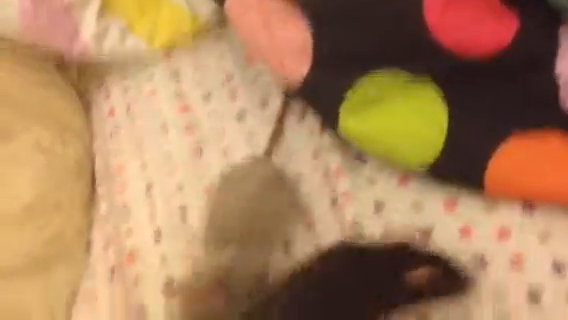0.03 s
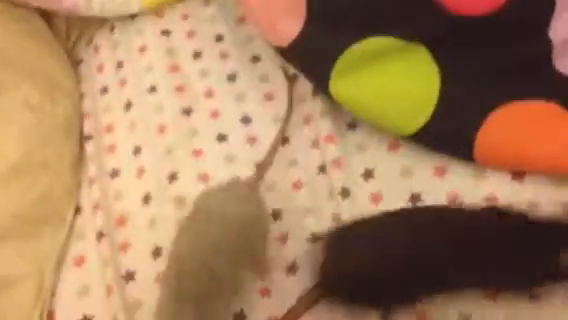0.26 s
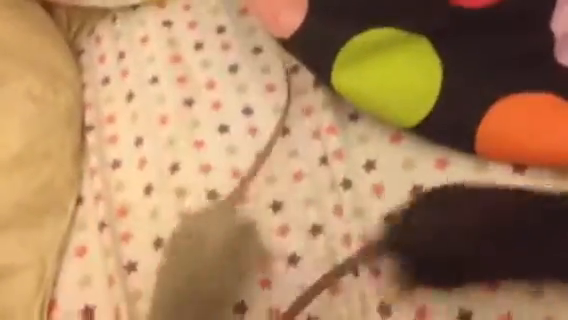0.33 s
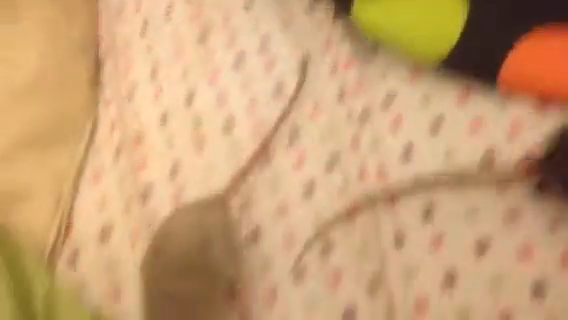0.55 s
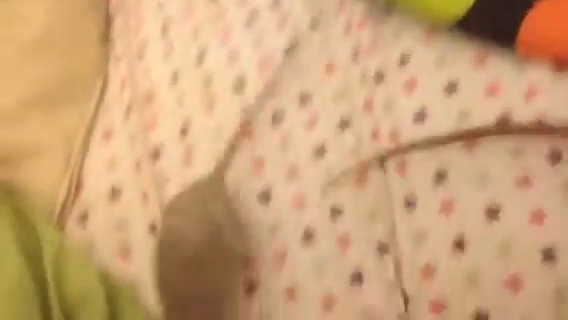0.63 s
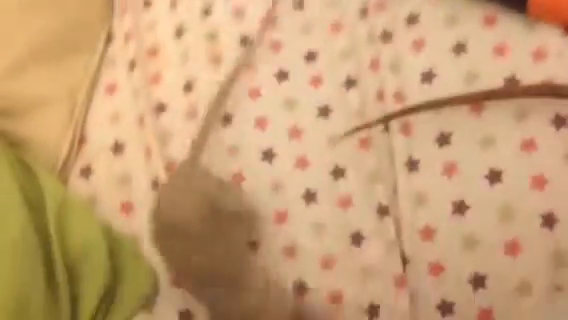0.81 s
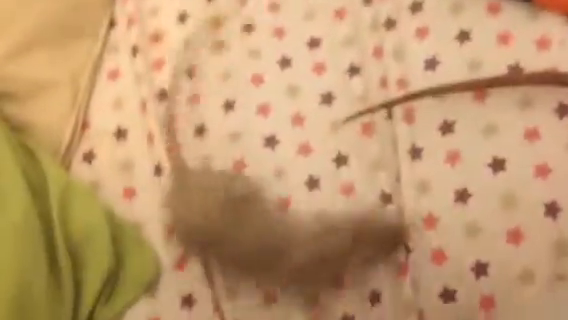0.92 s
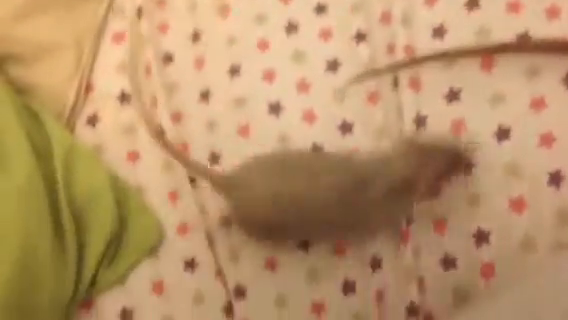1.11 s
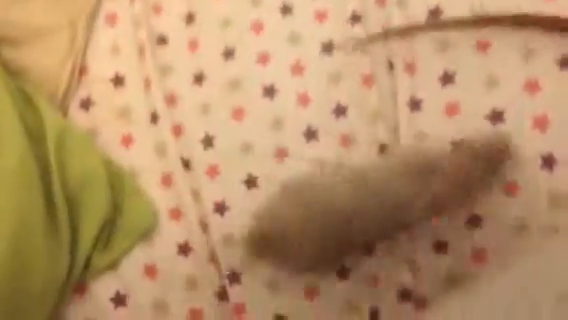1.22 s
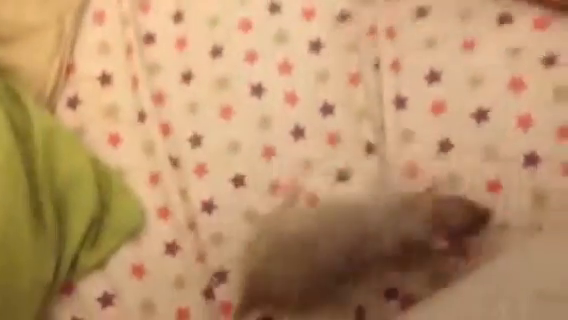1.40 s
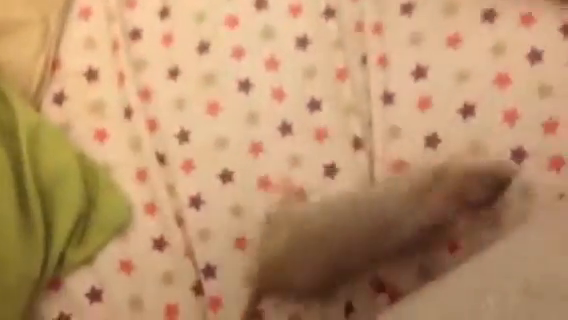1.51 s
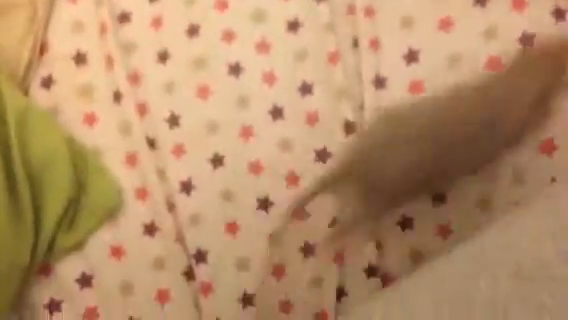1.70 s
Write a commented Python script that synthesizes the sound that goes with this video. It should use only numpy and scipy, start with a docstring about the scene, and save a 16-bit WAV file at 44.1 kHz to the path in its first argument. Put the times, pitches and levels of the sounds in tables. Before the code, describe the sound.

A hand-held camera's casing clicks, close and dry. One sharp snap at about 0.2 seconds is the loudest sound, followed by faint ticks. Clearer clicks come at 0.9, 1.1 and 1.3 seconds, then a quick cluster with a soft grip thud near 1.5. Faint fabric brushing and a few thin scratches from pet rats come in the second half, over light handling rustle and steady room hiss.

```python
"""A hand-held camera's casing gives one sharp snap and a string of dry clicks and ticks.
Each is a slip exciting the damped shell. Fingers bump it softly; a shifting grip thuds once.
Fabric brushes in short strokes, with faint scuffs and handling rustle.
The camera follows two pet rats, almost silent on their bedding but for a few thin scratches.
All close and dry, over the hiss of a quiet room."""
import sys
import numpy as np
from scipy import signal
from scipy.fft import rfft, irfft
from scipy.io import wavfile
from scipy.ndimage import map_coordinates

SR = 44100
rng = np.random.default_rng(int(sys.argv[2]) if len(sys.argv) > 2 else 0)


def transcribe(signal):
    """Save signal, clipped to [-1, 1], as a 16-bit WAV file at the path in sys.argv[1]."""
    frames = np.atleast_2d(signal).T
    limited = np.clip(frames, -1, 1)
    pcm = np.round(limited * 32767).astype(np.int16)
    wavfile.write(sys.argv[1], SR, pcm)


N = 77175
TIME_S = np.arange(N) / SR
FREQ_HZ = np.fft.rfftfreq(2 * N, 1 / SR)

# casing response to the snap: freq_hz, gain_db
SNAP_RESPONSE = [(40, -48), (100, -24.5), (240, -5), (400, -3.5), (560, -6.5), (1150, -4.5), (1450, -10.5),
                 (1780, -10.5), (2200, -1.5), (2850, -0.5), (4300, -14.5), (5100, -38), (6600, -23.5),
                 (8200, -37), (11000, -49), (14500, -36.5)]
# casing response to a click: freq_hz, gain_db
CLICK_RESPONSE = [(40, -45), (130, -31), (330, -8), (590, -10.5), (820, -4.5), (1100, -2.5), (1400, -6.5),
                  (1640, -15.5), (1830, -3.5), (2060, 1), (2450, -4), (3000, -4), (4300, -10.5),
                  (5100, -23.5), (6400, -19.5), (8100, -19), (10000, -29.5), (13500, -29), (15400, -37)]
# casing clicks: start_s, level_db, bass_db, treble_db
CASING_CLICKS = [(0.0692, -23.5, -1, -5), (0.2579, -29.5, 2, 6), (.264, -30, 2, 0), (0.5456, -20.5, 1, -12),
                 (.5637, -23, -4, -14), (.634, -30.5, -4, 7), (0.7602, -23.5, 1, -18),
                 (.7811, -25, -10, -17), (.7868, -24, -4, -16), (.7881, -27, -4, -19),
                 (0.8318, -29, -4, -10), (0.8874, -8.5, -2, -9), (0.964, -28, -2, -4),
                 (.9790, -33, -2, -19), (1.0379, -26.5, -4, 9), (1.0879, -6.5, -9, -9.5),
                 (1.140, -33, 0, 7), (1.2594, -34, -2, 5), (1.2934, -2.5, -8.5, 1.5), (1.4264, -7, -13, -4),
                 (1.4569, -7, -10, 0), (1.4634, -19, 17, -17), (1.4651, -24, 2, -21),
                 (1.4750, -17.5, 5, -17), (1.4872, -26, 4, -10), (1.5047, -19, 3, -16)]
# finger contacts: start_s, level_db, pitch_hz, t60_s
FINGER_BUMPS = [(.112, -40.5, 300, 0.01), (.142, -46, 483, 0.0061), (.1512, -47, 700, 0.012),
                (.171, -43.5, 480, 0.012), (.413, -50.5, 395, 0.028), (.556, -45.5, 483, 0.017),
                (.745, -49, 550, .007), (.751, -41, 654, 0.0042), (0.7603, -40, 1180, .006),
                (0.9635, -42, 1090, 0.0066), (0.978, -41, 985, 0.0077), (1.2155, -48, 218, 0.049),
                (1.2305, -46.5, 450, .01), (1.2647, -40, 364, 0.015), (1.265, -42, 1600, 0.0056),
                (1.268, -46, 690, 0.0071), (1.4634, -35.5, 1430, .006), (1.4638, -41, 262, 0.013),
                (1.4878, -38.5, 850, 0.007), (1.506, -44, 960, .006)]
# fabric strokes: start_s, length_s, level_db
FABRIC_STROKES = [(0.797, 0.19, -70.5), (0.987, 0.062, -68), (1.054, .15, -75.5), (1.211, 0.033, -63),
                  (1.25, 0.043, -68), (1.311, 0.025, -67), (1.352, .11, -74), (1.463, 0.073, -73.5),
                  (1.528, 0.064, -67), (1.60, 0.12, -72.5)]
# sliding fabric: freq_hz, density_db
FABRIC_SPECTRUM = [(200, -34), (1500, -3), (2700, -10), (4200, 2), (5200, -7), (6600, -0.5), (9500, -4),
                   (12000, -1), (14300, 2), (15500, -1.5)]
# friction scuffs: centre_s, sigma_s, level_db, pitch_hz
FRICTION_SCUFFS = [(0.023, 0.0081, -70.5, 1680), (.335, 0.011, -71, 2940), (0.43, 0.018, -69, 1100),
                   (0.572, 0.011, -64, 880), (0.782, 0.0078, -67.5, 2300), (0.917, 0.02, -68, 1180),
                   (0.979, 0.0044, -70, 1100), (1.01, 0.0064, -65.5, 900), (1.04, 0.0052, -71, 900),
                   (1.07, .008, -62.5, 900), (1.105, 0.011, -62, 1120), (1.2084, 0.0017, -56.5, 1190),
                   (1.231, 0.0037, -64, 1190), (1.268, .0028, -56.5, 900), (1.339, 0.0093, -63, 1080),
                   (1.438, 0.023, -65, 1500), (1.472, 0.013, -58, 1090), (1.505, 0.0091, -62, 1290),
                   (1.567, 0.041, -69, 1370), (1.742, 0.0077, -63, 790)]
# thin scratches: centre_s, sigma_s, level_db
CLAW_SCRATCHES = [(1.037, 0.0032, -63.5), (1.2065, 0.0032, -60), (1.2143, .001, -57), (1.327, 0.0011, -66),
                  (1.3327, .0007, -58.5), (1.446, 0.00089, -62)]
# scratch noise: freq_hz, density_db
SCRATCH_SPECTRUM = [(500, -25), (3500, -11), (4500, 9), (5400, -7), (7200, 2), (8800, -3.5), (15000, -12)]
# handling rustle: time_s, level_db
RUSTLE_ENVELOPE = [(0, -66.5), (.16, -66), (.28, -63), (.36, -70), (.45, -65), (.58, -66), (.68, -80),
                   (.85, -71.5), (1.02, -63), (1.16, -69.5), (1.4, -71), (1.75, -66)]
# hand rubbing: freq_hz, density_db
RUSTLE_SPECTRUM = [(40, -21), (120, -12.5), (260, 2.5), (420, -1), (550, -6), (800, -5.5), (1150, -14),
                   (2100, -19), (4000, -31.5), (15000, -41)]
# room and microphone hiss: freq_hz, density_db
HISS_SPECTRUM = [(25, -18), (45, -17), (60, -12.5), (80, -14), (115, -5), (210, -0.5), (330, -7.5),
                 (600, -8), (1200, -18.5), (2000, -18.5), (2900, -23.5), (4300, -22), (5300, -26.5),
                 (6800, -26), (10000, -35), (14500, -28), (16000, -33)]


def casing(snap_s=.2181, snap_db=11, bass_hz=650, treble_hz=4640, bend_lag_s=.00089, bend_hz=1200):
    """Each slip is an impulse through the heavily damped shell; low bending waves arrive late."""
    log_snap = causal(colour_db(SNAP_RESPONSE))
    log_click = causal(colour_db(CLICK_RESPONSE))
    bass_shelf = causal(1 / (1 + (FREQ_HZ / bass_hz) ** 4))
    treble_shelf = causal(1 - 1 / (1 + (FREQ_HZ / treble_hz) ** 4))
    spectrum = amp(snap_db) * rattle() * np.exp(log_snap - 2j * np.pi * FREQ_HZ * snap_s)
    for start_s, level_db, bass_db, treble_db in CASING_CLICKS:
        log_shell = log_click + bass_db * bass_shelf + treble_db * treble_shelf
        spectrum += amp(level_db) * rattle() * np.exp(log_shell - 2j * np.pi * FREQ_HZ * start_s)
    dispersion = np.exp(-2j * np.pi * bend_lag_s * bend_hz * np.arctan(FREQ_HZ / bend_hz))
    return irfft(spectrum * dispersion)[:N]


def rattle(level_db=-20.5, t60_s=.023):
    """Spectrum of an impulse plus the casing's faint random after-rattle."""
    tail = rng.standard_normal(N) * decay(TIME_S, t60_s)
    return 1 + amp(level_db) * rfft(tail / np.linalg.norm(tail), 2 * N)


def finger_bumps():
    """Soft finger contacts and the grip's thud, with their deep bass cut away."""
    contacts = sum(bump(*row) for row in FINGER_BUMPS) + grip_thud()
    return low_cut(contacts, cutoff_hz=102)


def bump(start_s, level_db, pitch_hz, t60_s, attack_s=.0005):
    """One contact rings one damped mode."""
    age_s = np.maximum(TIME_S - start_s, 0)
    envelope = decay(age_s, t60_s) * (1 - np.exp(-age_s / attack_s))
    return amp(level_db) * envelope * np.sin(2 * np.pi * pitch_hz * age_s)


def grip_thud(centre_s=1.493, pitch_hz=212):
    """The grip shifts: a round pulse with a low after-ring."""
    envelope = swell(centre_s, sigma_s=.0024, level_db=-39.5)
    pulse = envelope * np.sin(2 * np.pi * pitch_hz * (TIME_S - centre_s))
    return pulse + bump(centre_s, level_db=-52, pitch_hz=124, t60_s=.08)


def fabric_brushing(attack_s=.0094, release_s=.022):
    """Sliding fabric hisses; each stroke rises, holds and dies."""
    power = np.zeros(N)
    for start_s, length_s, level_db in FABRIC_STROKES:
        rise = np.clip((TIME_S - start_s) / attack_s, 0, 1)
        fall = np.exp(-np.maximum(TIME_S - start_s - length_s, 0) / release_s)
        power += (amp(level_db) * rise * fall) ** 2
    return np.sqrt(power) * noise(FABRIC_SPECTRUM)


def scuffs(half_width_oct=.76, skirt_db=18):
    """Brief swells of grainy friction, each in a broad band around its pitch."""
    offset_oct = np.arange(-6, 6.5, .5)
    band_db = -skirt_db * np.log10(1 + (offset_oct / half_width_oct) ** 4) / 2
    out = np.zeros(N)
    for centre_s, sigma_s, level_db, pitch_hz in FRICTION_SCUFFS:
        band = np.column_stack([pitch_hz * 2 ** offset_oct, band_db])
        out += swell(centre_s, sigma_s, level_db) * friction(band)
    return out


def claw_scratches():
    """Tiny bright rasps with two resonances, likely claws catching threads."""
    return sum(swell(*row) for row in CLAW_SCRATCHES) * noise(SCRATCH_SPECTRUM)


def handling_rustle():
    """Dull, uneven rubbing as the hand moves."""
    level_db = np.interp(TIME_S, *np.transpose(RUSTLE_ENVELOPE))
    return amp(level_db) * friction(RUSTLE_SPECTRUM)


def room_hiss(level_db=-65):
    """Steady noise of room and microphone."""
    return amp(level_db) * noise(HISS_SPECTRUM)


def friction(points, depth_db=3.5, grains_per_s=200):
    """Coloured noise that catches and slips in random grains, rms 1."""
    grain_index = TIME_S * grains_per_s
    catch = map_coordinates(rng.standard_normal(N // 20), [grain_index], mode="wrap")
    return unit_rms(noise(points) * amp(depth_db * catch))


def noise(points):
    """Coloured noise, rms 1."""
    white = rfft(rng.standard_normal(2 * N))
    return unit_rms(irfft(white * amp(colour_db(points)))[:N])


def colour_db(points):
    """Gain per bin from (freq_hz, gain_db) points on a log axis."""
    freq_hz, gain_db = np.transpose(points)
    return np.interp(np.log(FREQ_HZ + 1), np.log(freq_hz), gain_db)


def causal(gain_db):
    """Log spectrum of the minimum-phase response with this gain."""
    cepstrum = irfft(np.log(amp(gain_db)))
    cepstrum[1:N] *= 2
    cepstrum[N + 1:] = 0
    return rfft(cepstrum)


def swell(centre_s, sigma_s, level_db):
    """Gaussian envelope."""
    return amp(level_db) * np.exp(-.5 * ((TIME_S - centre_s) / sigma_s) ** 2)


def decay(age_s, t60_s):
    """Exponential envelope."""
    return np.exp(-np.log(1000) * age_s / t60_s)


def low_cut(x, cutoff_hz):
    """Second-order high-pass."""
    return signal.sosfilt(signal.butter(2, cutoff_hz, "highpass", fs=SR, output="sos"), x)


def amp(db):
    """Decibels to gain."""
    return 10 ** (np.asarray(db) / 20)


def unit_rms(x):
    """Scale to rms 1."""
    return x / np.sqrt(np.mean(x ** 2) + 1e-20)


def scene():
    """Dry mono sum."""
    impacts = casing() + finger_bumps()
    rubbing = fabric_brushing() + scuffs() + claw_scratches() + handling_rustle()
    return (impacts + rubbing + room_hiss())[None]


def record(dry):
    """The camera's microphone thins the deep bass; nothing passes above the band limit."""
    top_hz = 15500
    thinned = low_cut(dry, cutoff_hz=64)
    return irfft(rfft(thinned, 2 * N) * (FREQ_HZ < top_hz))[..., :N]


dry = scene()
out = record(dry)
transcribe(out)
```